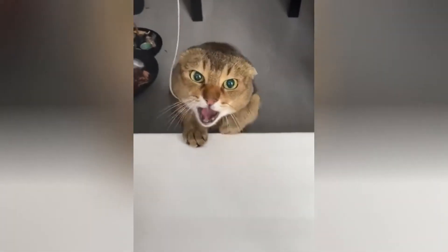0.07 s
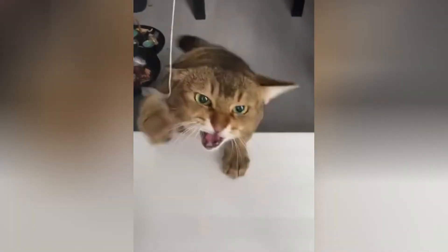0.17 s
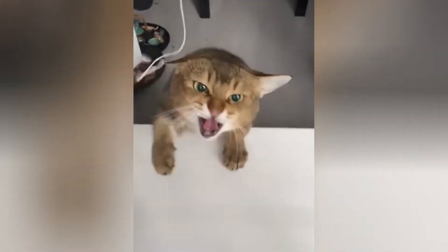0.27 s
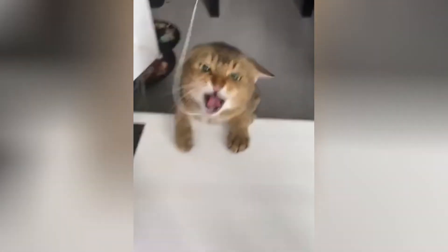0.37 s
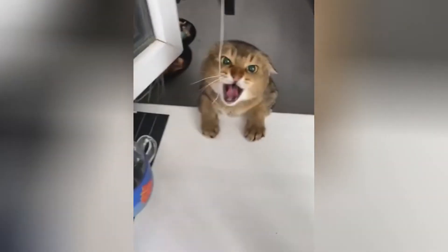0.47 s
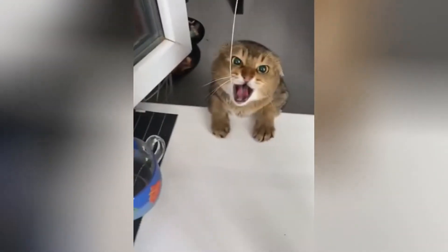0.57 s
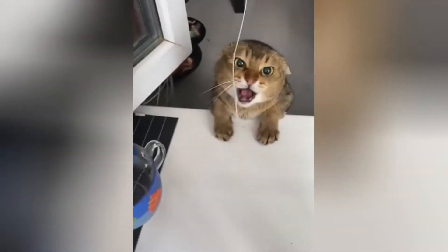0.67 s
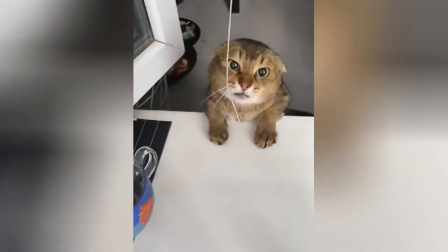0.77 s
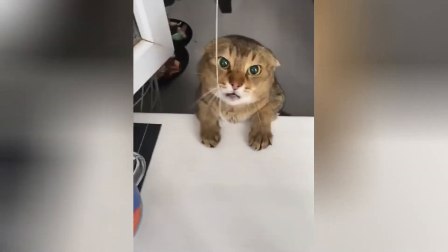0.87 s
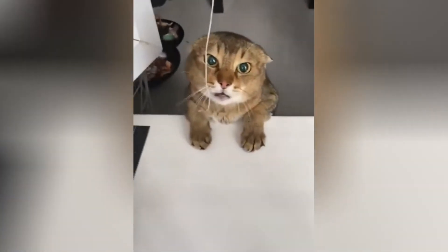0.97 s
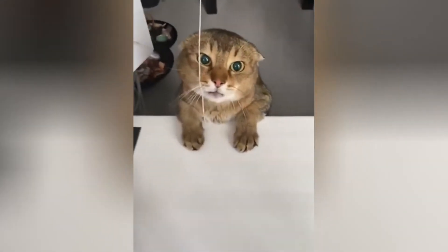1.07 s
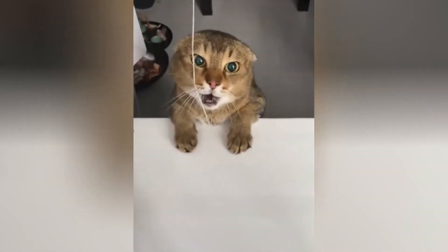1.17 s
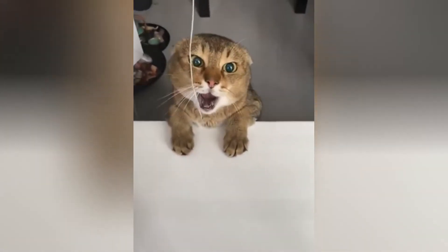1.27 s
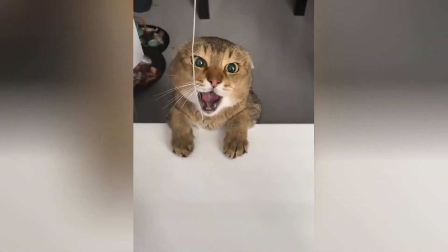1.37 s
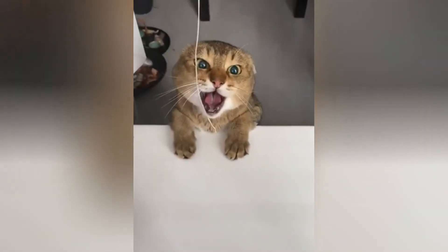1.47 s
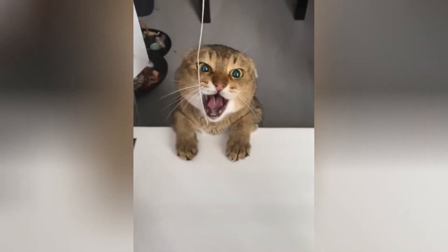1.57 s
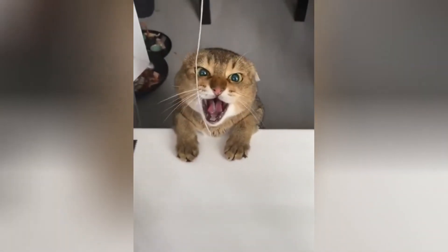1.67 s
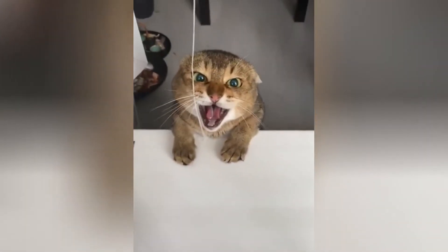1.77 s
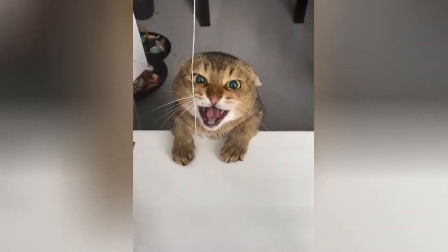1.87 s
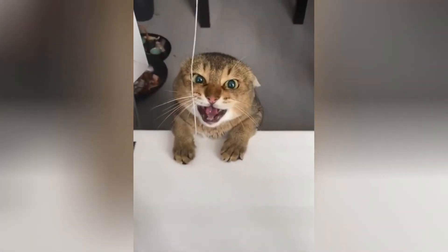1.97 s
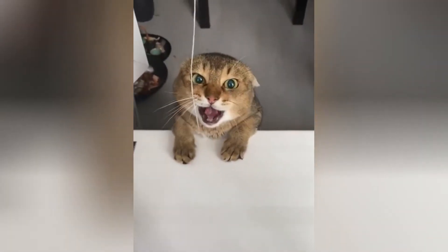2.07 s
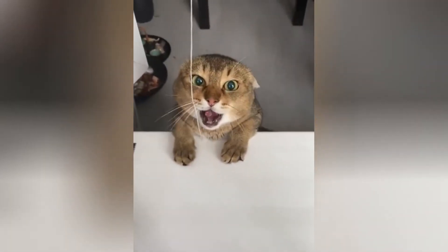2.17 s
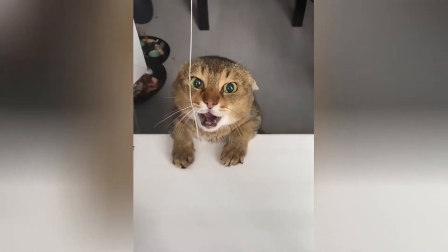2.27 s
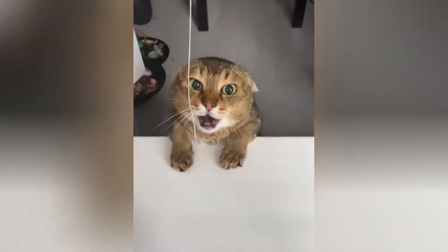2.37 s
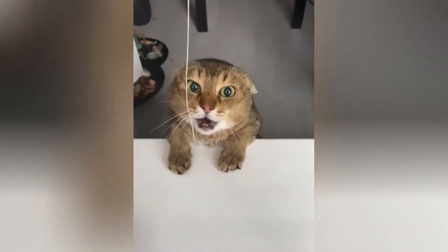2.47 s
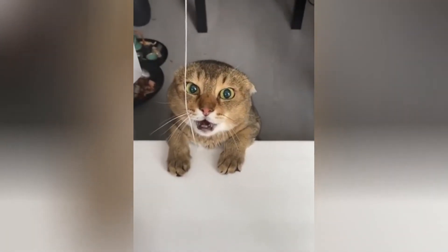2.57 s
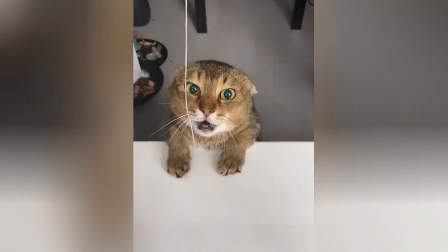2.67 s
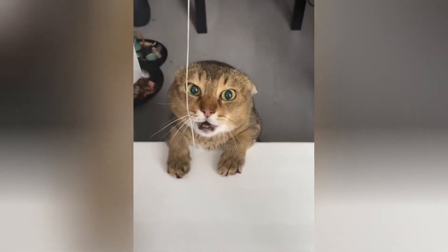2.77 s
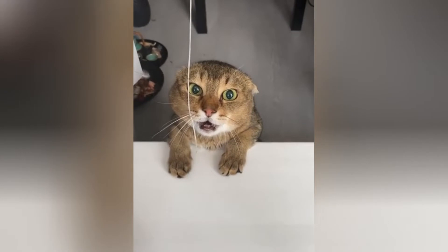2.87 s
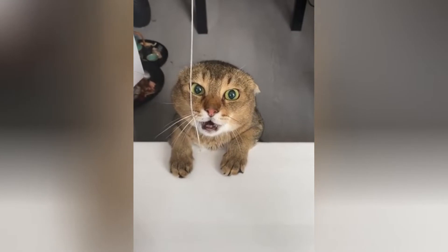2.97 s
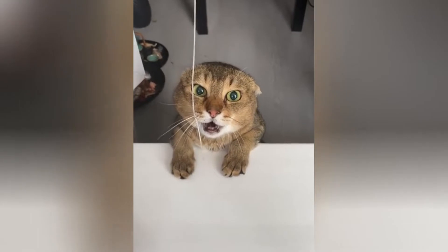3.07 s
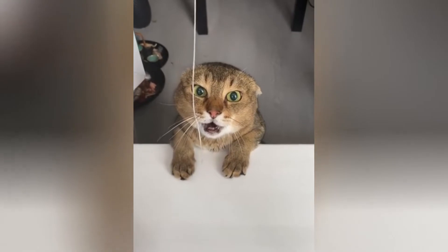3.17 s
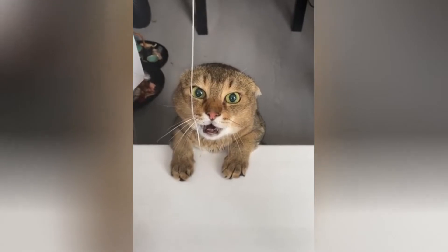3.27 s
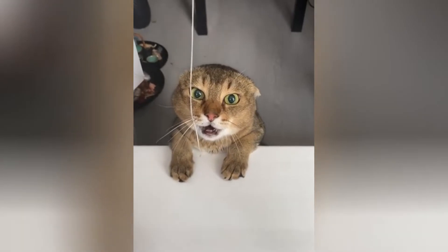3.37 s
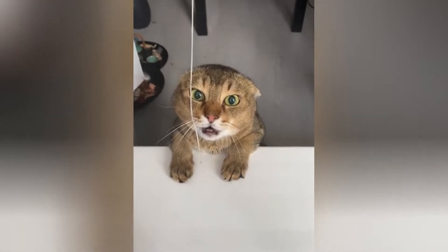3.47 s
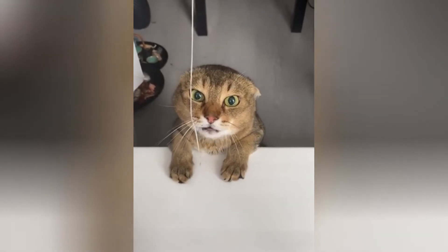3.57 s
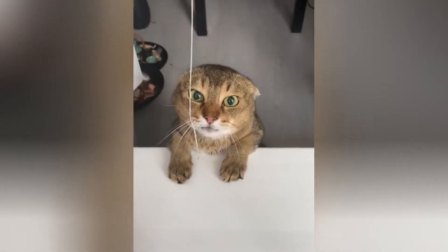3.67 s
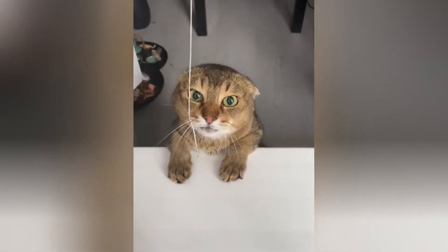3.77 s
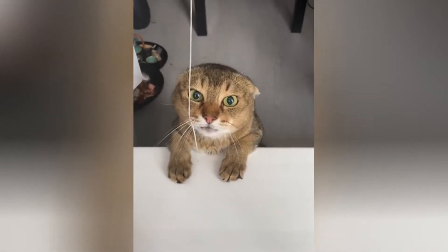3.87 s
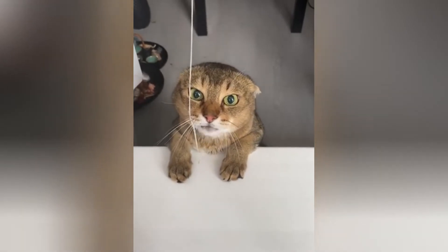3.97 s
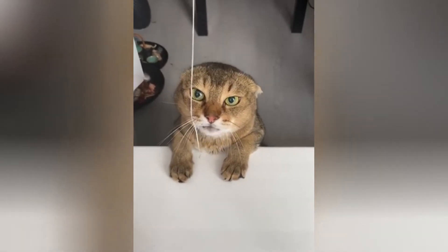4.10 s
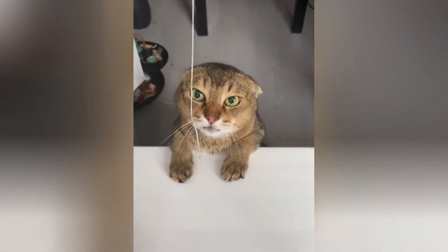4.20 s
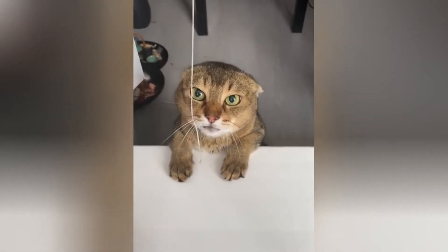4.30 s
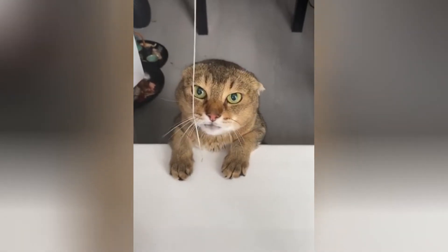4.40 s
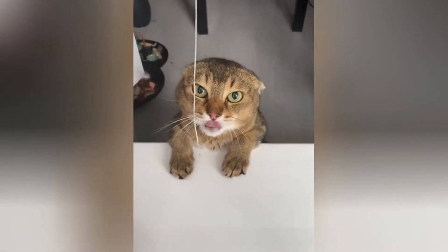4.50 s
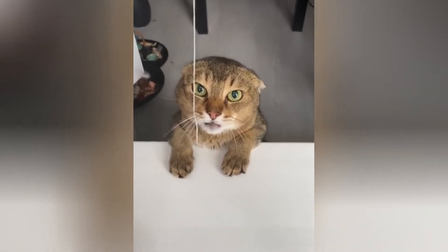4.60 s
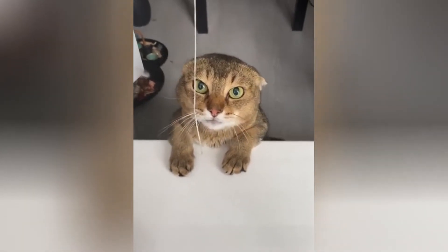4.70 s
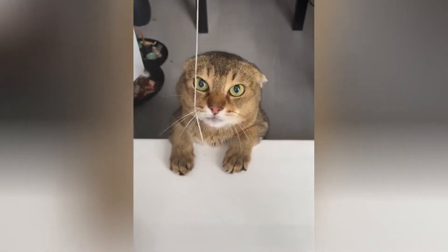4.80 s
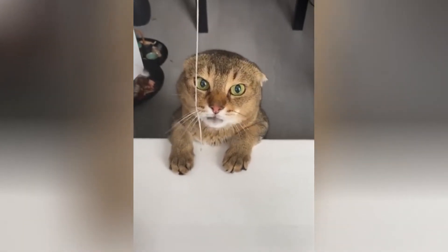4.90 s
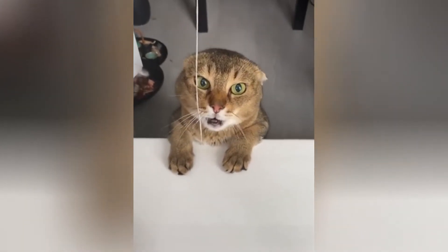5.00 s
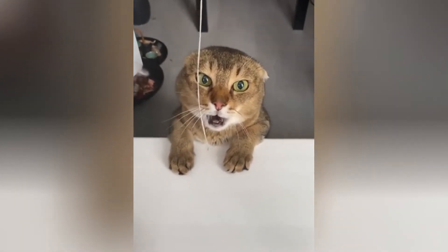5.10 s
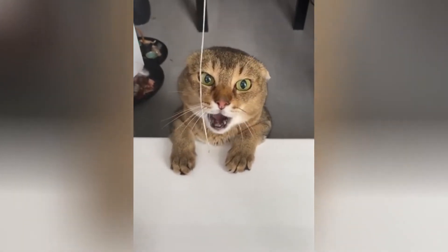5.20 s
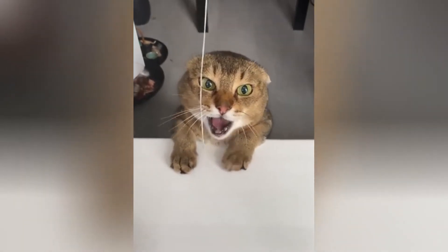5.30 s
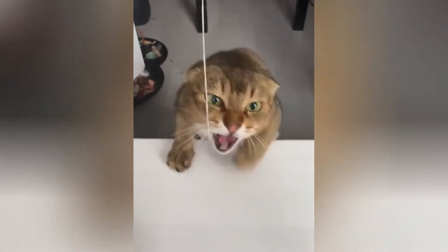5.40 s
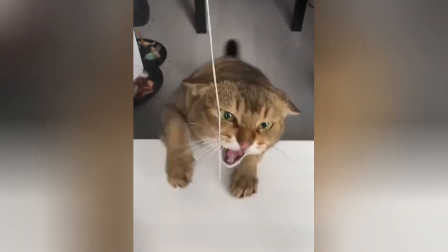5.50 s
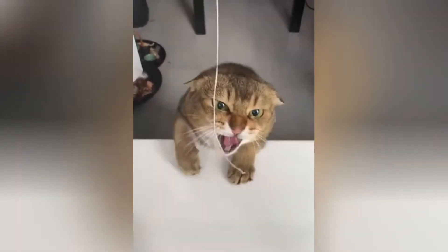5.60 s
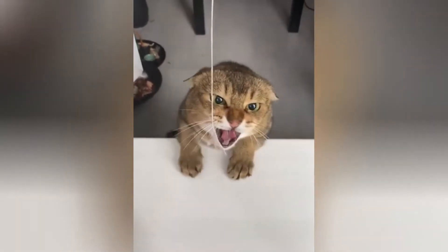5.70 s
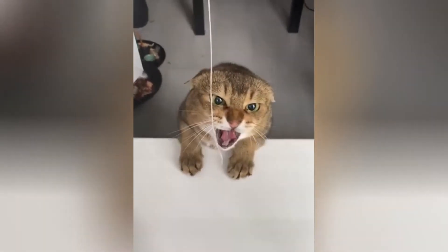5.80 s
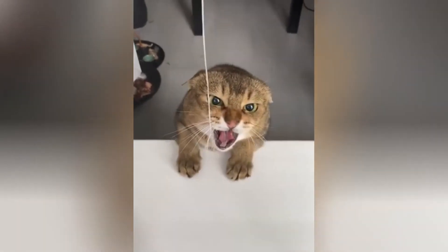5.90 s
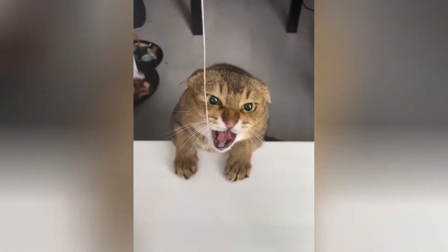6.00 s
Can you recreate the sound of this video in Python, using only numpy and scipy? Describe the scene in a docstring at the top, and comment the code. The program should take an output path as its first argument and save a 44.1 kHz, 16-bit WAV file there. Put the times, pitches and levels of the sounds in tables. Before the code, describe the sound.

A cat yowls close to the microphone in a quiet room with a slight echo. The first call starts at once, rising to a loud, high, raspy cry and dropping away at 0.8 seconds. A paw thumps softly on a table at about 0.2 seconds. Around 1 second the cat takes a faint, fluttering, snore-like breath. From 1.2 seconds comes a long, clearer yowl that peaks in pitch near 1.8 seconds, then slides steadily down and fades, becoming a very quiet closed-mouth hum from about 3.6 to 4.3 seconds. Tiny lip and claw ticks fall between 4.5 and 5.1 seconds. The third call begins low and hoarse at 5 seconds and climbs to a loud, high cry by 5.5 seconds, where a lighter paw thump lands. It holds that pitch, repeatedly breaking into a rasp, until the end at about 6 seconds.

```python
"""Three yowls from a cat leaning on a table edge indoors, close to a hand-held stereo microphone.
Its vocal folds ring mouth, throat and nose, and at full effort break into a rasp; the long middle
call sinks to a closed-mouth hum. Slack tissue flaps in a snoring breath after the first call.
A paw thumps the table twice, and lips and claws tick faintly, over the hush of a quiet room."""
import sys
import numpy as np
from scipy import signal
from scipy.fft import rfft, irfft, next_fast_len
from scipy.io import wavfile
from scipy.ndimage import uniform_filter1d

SR = 44100
rng = np.random.default_rng(int(sys.argv[2]) if len(sys.argv) > 2 else 0)


def dump(signal):
    """Clip the signal to [-1, 1] and save it as 16-bit WAV at the path in sys.argv[1]."""
    limited = np.clip(np.atleast_2d(signal).T, -1, 1)
    pcm = np.round(limited * 32767).astype(np.int16)
    wavfile.write(sys.argv[1], SR, pcm)


N = 266805
BAND_LIMIT_HZ = 15750

# Vocal tract per call: (time [s], mouth resonance [Hz], mouth [dB], throat [dB], sizzle [dB])
TRACT_A = [(0.0, 1550, -42.5, -42, -67.5), (0.061, 2044, -27.5, -44, -58), (0.106, 2300, -17, -35.5, -56),
           (0.168, 2240, -11.5, -37.5, -47), (0.27, 2120, -14.5, -42, -50),
           (0.362, 2185, -16.5, -37.5, -50), (0.42, 2050, -21.5, -33.5, -47.5),
           (0.52, 2050, -19, -36.5, -47.5), (0.626, 2120, -12.5, -39, -48), (0.648, 2060, -18, -38, -48.5),
           (0.681, 1938, -17.5, -36.5, -47.5), (0.718, 1785, -18, -32, -50.5),
           (0.755, 1580, -30, -56.5, -59.5), (0.79, 1494, -59, -62, -68)]
TRACT_B = [(1.17, 900, -66.5, -92, -100), (1.23, 1498, -53.5, -63.5, -76),
           (1.33, 1648, -30.5, -35.5, -78.5), (1.46, 1800, -30, -37, -56.5), (1.55, 1800, -27, -32, -52.5),
           (1.62, 1930, -22, -25, -47.5), (1.69, 2140, -21.5, -30.5, -45.5), (1.77, 1920, -24.5, -28, -41),
           (1.85, 1860, -27.5, -29.5, -38.5), (1.96, 1740, -23, -27.5, -45), (2.079, 1650, -17, -29, -50.5),
           (2.149, 1670, -14.5, -54, -54.5), (2.279, 1630, -18, -56, -66), (2.431, 1480, -27.5, -44, -64.5),
           (2.64, 1300, -34.5, -34.5, -64), (2.74, 1295, -38, -40, -71), (2.86, 1200, -39, -43, -69.5),
           (2.96, 1198, -37, -48.5, -68), (3.091, 1130, -33, -32.5, -67.5), (3.126, 1083, -39, -34.5, -70),
           (3.28, 1090, -33, -41, -73), (3.459, 1122, -45, -63.5, -76), (3.558, 1140, -57.5, -48, -76),
           (3.66, 545, -55.5, -63, -91), (3.79, 467, -61.5, -105, -106), (4.2, 433.5, -63, -94, -111),
           (4.27, 474, -77, -94.5, -110)]
TRACT_C = [(4.961, 1524, -72.5, -85, -99), (5.04, 1340, -70, -74.5, -83), (5.166, 1413, -38, -44, -71.5),
           (5.22, 1793, -32.5, -48, -71), (5.326, 1786, -28, -44, -66), (5.378, 2120, -22, -26.5, -52.5),
           (5.438, 2250, -16.5, -28, -51.5), (5.474, 2350, -10, -36, -48.5), (5.508, 2200, -15, -43, -51),
           (5.61, 2223, -13.5, -37, -45), (5.68, 2300, -17, -51, -63), (5.72, 2178, -14, -35.5, -54),
           (5.78, 2343, -19, -34.5, -50), (5.83, 2194, -13.5, -36.5, -48.5), (5.98, 2250, -15, -49, -56),
           (6.05, 2132, -13, -35, -58)]
# Fold pitch before strain: (time [s], pitch [Hz])
PITCH_A = [(0.0, 338.5), (0.04, 421), (0.072, 486.6), (0.11, 546.4), (0.15, 678.5), (0.22, 700),
           (0.27, 746.2), (0.43, 747), (0.47, 708.3), (0.52, 722), (0.63, 716.5), (0.692, 641.6),
           (0.756, 495), (0.79, 435.4)]
PITCH_B = [(1.17, 191), (1.214, 295.2), (1.272, 407.4), (1.3, 450.1), (1.398, 486.5), (1.54, 531.2),
           (1.6, 571.3), (1.68, 632), (1.75, 663), (1.81, 676.4), (1.88, 659.7), (1.982, 613.4),
           (2.088, 565.3), (2.134, 556.3), (2.298, 540.5), (2.396, 512.4), (2.63, 450), (2.806, 408.7),
           (2.896, 397.5), (3.091, 388.9), (3.122, 374.7), (3.179, 369.7), (3.27, 363.8), (3.442, 348.6),
           (3.598, 310.6), (3.678, 285), (3.734, 256), (3.822, 258.3), (4.05, 256), (4.186, 238.5),
           (4.22, 227), (4.27, 232)]
PITCH_C = [(4.96, 199.6), (5.02, 131), (5.09, 191.3), (5.152, 322.8), (5.202, 416.4), (5.316, 491.9),
           (5.424, 669.5), (5.455, 699.7), (5.5, 738.8), (5.574, 741.5), (5.6, 700), (5.659, 742),
           (5.7, 733), (5.78, 717.4), (5.9, 744), (6.05, 717.5)]
# Nasal ring, one list per call: (time [s], level [dB])
NASAL_LEVELS = [
    [(0.0, -54.5), (0.062, -44.5), (0.076, -43.5), (0.148, -29), (0.374, -41), (0.4, -37.5), (0.5, -34.5),
     (0.532, -29.5), (0.66, -34), (0.72, -48), (0.756, -44), (0.79, -71)],
    [(1.17, -99), (1.23, -75), (1.41, -47.5), (1.83, -35.5), (2.12, -49.5), (2.26, -47.5), (2.46, -60),
     (2.86, -65.5), (3.07, -59.5), (3.53, -64.5), (3.65, -91), (4.27, -101)],
    [(4.96, -99), (4.98, -82), (5.032, -90), (5.096, -73), (5.324, -52.5), (5.384, -34), (5.614, -33),
     (5.658, -38), (5.736, -33.5), (5.98, -37), (6.018, -31), (6.05, -31.5)],
]
# Hoarse onset per call: (initial rasp [0-1], decay [s], rasp until full voice [0-1], full voice at [s])
HOARSE_ONSETS = [(.1, .05, .2, .14), (.4, .05, .006, 1.64), (.4, .1, .19, 5.42)]
# Slack throat per call: (resonance [Hz])
THROAT_SLACK_HZ = [3200, 2462, 2730]
# Hum on clear, tense notes, per call: (level change [dB])
HUM_TENSE_DB = [-17.5, -11.5, 2.5]


def yowls():
    """Three voiced calls, each as (start time, sound)."""
    calls = zip((TRACT_A, TRACT_B, TRACT_C), (PITCH_A, PITCH_B, PITCH_C),
                NASAL_LEVELS, HOARSE_ONSETS, THROAT_SLACK_HZ, HUM_TENSE_DB)
    return [yowl(*call) for call in calls]


# Nasal and top-treble resonances: (centre [Hz], width [Hz], level added as the jaw opens [dB],
# base level [dB], counted 1.5 times open and 2.5 times shut)
NASAL_MODES = [(3453, 160, -35, -1.5), (4875, 170, -14, 0.5), (5300, 720, -5, -5), (5780, 570, -4.5, -21.5),
               (6820, 500, -16, 1)]
SIZZLE_MODES = [(8683, 2800, 0.5, 1), (9910, 580, -15, -32.5), (12350, 540, -16.5, 8),
                (15370, 480, -15.5, -34)]
# Chest hum: (pitch [Hz], level [dB])
CHEST_HUM = [(150, -59.5), (300, -58), (460, -65), (560, -61), (680, -53.5), (740, -59)]
HUM_RASP_DB, RATTLE_OVER_HUM_DB, STRAIN_RISE = 6.5, 6.5, 0.065


def yowl(tract, pitch, nasal, onset, slack_hz, hum_tense_db):
    """Fold pulses ring mouth, throat and nose over a chest hum; a low rattle joins the hard rasps."""
    t, (mouth_hz, mouth_db, throat_db, sizzle_db) = curves(tract)
    nasal_db = np.interp(t, *np.transpose(nasal))
    pitch_hz = uniform_filter1d(np.interp(t, *np.transpose(pitch)), size=800, mode="nearest")
    jaw = np.clip((mouth_hz - 1250) / 600, 0, 1)  # the mouth resonance rises as the jaw opens
    tension = np.interp(pitch_hz, (616, 667), (0, 1))
    rasp, tripling = voice_breaks(t, pitch_hz, onset)
    strain = uniform_filter1d(rasp * (tripling > 0), size=800)
    folds, cycles = vocal_folds(t, pitch_hz * (1 + STRAIN_RISE * strain), rasp, tripling, jaw)

    voice = gain_of(mouth_db) * mouth(folds, mouth_hz)
    voice -= gain_of(throat_db) * throat(folds, pitch_hz, slack_hz, tension, jaw)
    for level_db, modes in ((nasal_db, NASAL_MODES), (sizzle_db, SIZZLE_MODES)):
        ringing = sum(gain_of(jaw * added_db + (2.5 - jaw) * base_db) * ring(folds, hz, width_hz)
                      for hz, width_hz, added_db, base_db in modes)
        voice += gain_of(level_db) * steady(ringing)

    hum_db = log_lookup(CHEST_HUM, pitch_hz) + HUM_RASP_DB * rasp + hum_tense_db * tension * (1 - rasp)
    hum_cycles = cycles + .15 * rasp * wander(len(t), 120)
    voice += gain_of(hum_db) * np.sqrt(2) * np.cos(2 * np.pi * hum_cycles)
    rattle = steady(ring(folds, hz=980, width_hz=130))
    voice += gain_of(hum_db + RATTLE_OVER_HUM_DB) * tripling * rattle
    edge_s = np.minimum(t - t[0], t[-1] - t)
    return t[0], voice * np.minimum(1, edge_s / .006)


# Voice breaks: (start [s], end [s], rasp [0-1], three-cycle pattern depth [0-1])
BREAKS = [(.14, .512, .85, .6), (1.52, 1.65, .04, 0), (1.9, 2.03, .012, 0), (3.42, 3.64, .03, 0),
          (5.08, 5.14, .8, .3), (5.45, 5.6, .9, .45), (5.612, 5.695, .8, .55), (5.903, 5.945, .75, .55),
          (5.975, 6.0, .75, .4)]
CLEAR_RASP, SLACK_RASP = .004, .12
BREAK_EDGE_S, FRINGE_S, FRINGE_SHARE = .018, .03, .07


def voice_breaks(t, pitch_hz, onset):
    """Rasp and three-cycle depth: the folds start hoarse, go ragged in breaks, loosen in quick falls."""
    initial, decay_s, held, full_voice_s = onset
    rasp = CLEAR_RASP + initial * np.exp(-(t - t[0]) / decay_s)
    rasp += held * np.clip((full_voice_s - t) / BREAK_EDGE_S, 0, 1)
    fall_per_s = -np.gradient(np.log(pitch_hz)) * SR
    rasp += np.interp(fall_per_s, (1.1, 4.5), (0, SLACK_RASP))
    tripling = np.zeros(len(t))
    for start_s, end_s, break_rasp, depth in BREAKS:
        inside_s = np.minimum(t - start_s, end_s - t)
        gate = np.clip(.5 + inside_s / BREAK_EDGE_S, 0, 1)
        fringe = FRINGE_SHARE * np.exp(np.minimum(inside_s, 0) / FRINGE_S)
        rasp = np.maximum(rasp, break_rasp * np.maximum(gate, fringe))
        tripling += depth * gate
    return rasp, tripling


def vocal_folds(t, pitch_hz, rasp, tripling, jaw):
    """Overtones and cycle count of the folds; rasp makes pulses uneven in time and strength, and noisy."""
    waver = .001 + .0065 * (pitch_hz / 750) ** 12  # strain wavers high notes
    cycles = np.cumsum(pitch_hz * (1 + waver * wander(len(t), 40))) / SR
    pattern = tripling * np.sin(2 * np.pi * (cycles / 3 + .15 * wander(len(t), 40)))
    cycles = cycles + .046 * rasp * wander(len(t), 160) + .08 * pattern
    overtones = np.zeros(len(t))
    for k in range(2, 45):
        swell_hz = rng.uniform(2.136, 9)
        swell_db = (4.2 + 1.2 * jaw) * np.sin(2 * np.pi * (swell_hz * t + rng.random())) * (k > 3)
        overtone = np.cos(2 * np.pi * (k * cycles + rng.random()))
        overtones += gain_of(swell_db) * overtone * (k * pitch_hz < BAND_LIMIT_HZ)
    shimmer = 1 + .36 * rasp * wander(len(t), 90) + .35 * pattern
    noise = .14 * rasp * rng.standard_normal(len(t))
    return steady(overtones) * shimmer + noise, cycles


def mouth(folds, mouth_hz):
    """The mouth cavity: a sharp moving peak on a broad skirt."""
    peak = resonate(folds, mouth_hz, width_hz=231.5)
    skirt = gain_of(db=5) * ring(peak, mouth_hz, width_hz=1800)
    return steady(resonate(peak, mouth_hz, width_hz=231.5) + skirt)


def throat(folds, pitch_hz, slack_hz, tension, jaw):
    """The throat resonance rises with tension, sinks on low notes and narrows as the jaw shuts."""
    sink_hz = np.interp(pitch_hz, (310, 345), (279.5, 0))
    throat_hz = slack_hz + tension * (3709 - slack_hz) - sink_hz
    broad = steady(ring(folds, throat_hz, width_hz=1200))
    narrow = unit_rms(ring(folds, throat_hz, width_hz=190))
    return jaw * broad + (1 - jaw) * narrow


# Snoring breath: (time [s], level [dB], flap rate [Hz])
SNORE = [(0.85, -63.5, 95), (0.96, -51, 90.5), (1.086, -56.5, 90), (1.12, -85, 110)]
# Airway resonances: (centre [Hz], width [Hz], level [dB])
AIRWAY_MODES = [(89.7, 98, 3.5), (357, 920, -3.5), (937.4, 120, -10.5), (1127, 290, -10), (3496, 400, -15),
                (4630, 540, -16)]


def snore():
    """Slack tissue flaps in the in-breath, strong and weak in turn, each flap with a puff of air."""
    t, (level_db, flap_hz) = curves(SNORE)
    cycles = np.cumsum(flap_hz * (1 + .07 * wander(len(t), 30))) / SR
    count = np.floor(cycles)
    flaps = np.diff(count, prepend=0) * (1 + 0.46 * np.cos(np.pi * count))
    puffs = 1.3 * (.4 + np.exp(-(cycles % 1) / .3)) * rng.standard_normal(len(t))
    drive = unit_rms(flaps) + puffs
    airway = sum(gain_of(db) * unit_rms(resonate(resonate(drive, hz, width_hz), hz, 2 * width_hz))
                 for hz, width_hz, db in AIRWAY_MODES)
    return t[0], gain_of(level_db) * unit_rms(airway) * signal.windows.tukey(len(t), .1)


# Paw strikes: (time [s], peak [dB], boost of modes above 200 Hz [dB])
PAW_STRIKES = [(0.156, -26, 1), (5.474, -40, 4.5)]
# Table-top modes: (frequency [Hz], level [dB], t60 [s])
TABLE_MODES = [(98.8, 0.5, 0.13), (118.2, -11.5, 0.25), (183, -7, 0.089), (280, -7, 0.055),
               (470, -3.5, 0.016), (833, -17, 0.075)]


def paw_thumps():
    """A soft paw rings the table top; its lowest modes swell a moment later."""
    out, t = np.zeros(N), np.arange(SR // 3) / SR
    for start_s, peak_db, boost_db in PAW_STRIKES:
        thump = np.zeros(len(t))
        for hz, db, t60_s in TABLE_MODES:
            attack = 1 - np.exp(-t * hz / 1.5)
            decay = gain_of(db + boost_db * (hz > 200) - 60 * t / t60_s)
            thump += attack * decay * np.sin(2 * np.pi * hz * t)
        add(out, start_s, gain_of(peak_db) * thump / abs(thump).max())
    return out


# Lip and claw ticks: (time [s], initial level [dB], centre [Hz], t60 [s])
TICKS = [(4.53, -64, 320, .05), (4.67, -66, 248, 0.051), (4.937, -64.5, 3040, .015),
         (4.952, -56, 2350, 0.027), (4.984, -58.5, 1490, 0.071), (5.073, -54, 1830, 0.069)]


def lips_and_claws():
    """Lips and claws make tiny damped ticks of narrow-band noise."""
    out, t = np.zeros(N), np.arange(3000) / SR
    for start_s, db, hz, t60_s in TICKS:
        noise = unit_rms(resonate(rng.standard_normal(len(t)), hz, width_hz=0.073 * hz))
        add(out, start_s, gain_of(db - 60 * t / t60_s) * noise)
    return out


# Room reverberation: (frequency [Hz], t60 [s], level [dB])
REVERB = [(250, 0.38, -37.5), (590, 0.73, -2), (1500, 0.21, -7), (3898, 0.24, -3.5), (9570, 0.033, -9)]


def room_echoes(source):
    """Reflections from ahead and from the sides: sparse taps, each band dying at its own rate."""
    taps = np.zeros((2, SR // 2))
    delays = np.arange(100, SR // 2 - 20, 20) + rng.integers(0, 20, (2, (SR // 2 - 101) // 20))
    np.put_along_axis(taps, delays, rng.choice([-1., 1.], delays.shape), 1)
    hz, t, bands = signal.stft(taps, SR, nperseg=256)
    bands *= gain_of(-60 * t / log_lookup(REVERB, hz)[:, None])
    bands *= np.sqrt(len(hz) / np.sum(abs(bands) ** 2, axis=(0, 2)))[:, None]  # equal energy per band
    norm = np.linalg.norm(signal.istft(bands, SR, nperseg=256)[1][0])
    bands *= gain_of(log_lookup(REVERB, hz, column=2))[:, None]
    tails = signal.istft(bands, SR, nperseg=256)[1] / norm
    return signal.fftconvolve(source[None], tails, axes=1)[:, :N]


# Microphone ports: (frequency [Hz], left minus right [dB], left lead [half turns])
PORTS = [(200, 0, 0), (350, 4, 0), (480, 6, 0), (560, 4, 0), (660, 2, 1), (830, 7, 2), (950, 11, 2.9),
         (1090, 2, 3.2), (1170, 6, 4), (1450, -2, 4), (1650, 2, 4), (1900, 0, 4), (2200, 4, 4),
         (2600, -3, 4), (3300, 0, 4), (4300, -6, 4), (6300, 0, 4)]
# Overall tone colour, with a sharp treble drop above 6.4 kHz: (frequency [Hz], gain [dB])
TONE_COLOUR = [(200, -1), (480, 8.5), (660, -5.5), (900, 7.5), (1090, -4), (1300, 1), (2200, -5.5),
               (2780, -2.5), (2970, -7.5), (3150, -0.5), (4150, 5), (4550, -5), (4800, 0), (5200, 0),
               (6350, 5.5), (6650, -24.5), (8000, -2)]


def microphone(near, echoes):
    """Two ports hear a near source with balance and lead set by frequency; a tone curve shapes the mix."""
    size = next_fast_len(N + SR)
    hz = np.fft.rfftfreq(size, 1 / SR)
    lead_rad = np.pi * log_lookup(PORTS, hz, column=2)
    left = gain_of(log_lookup(PORTS, hz) / 2) * np.exp(1j * lead_rad / 2)
    direct = rfft(near, size) * np.array([left, 1 / left])
    ahead, side = rfft(echoes, size)
    stereo = direct + ahead / 2 + np.array([side, -side])  # side echoes arrive in opposite phase
    return irfft(stereo * gain_of(log_lookup(TONE_COLOUR, hz)), size)[:, :N]


# Room hush spectrum: (frequency [Hz], relative density [dB])
HUSH_SPECTRUM = [(15, -39), (25, -11), (54, -4), (86, -2), (118, -11), (257, -10.5), (318, -8),
                 (438, -20.5), (729, -14.5), (879, -20), (3010, -23), (6200, -38.5), (15000, -51.5)]
# Hush between channels: (frequency [Hz], coherence [0-1])
HUSH_COHERENCE = [(60, 0.84), (240, 0.87), (950, 0.11), (3770, 0.21), (15000, 0.23)]
HUSH_RMS_DB, PATCH_DB = -70, 1.8


def room_hush():
    """The room's low hush: noise in drifting patches, much alike on both sides in the bass."""
    frames, hz = N // 256 + 5, np.fft.rfftfreq(1024, 1 / SR)
    left_re, left_im, apart_re, apart_im, patches = rng.standard_normal((frames, 513, 5)).T
    patches = unit_rms(uniform_filter1d(uniform_filter1d(patches, 8, axis=0), 10, axis=1))
    coherence = log_lookup(HUSH_COHERENCE, hz)[:, None]
    left = left_re + 1j * left_im
    right = coherence * left + np.sqrt(1 - coherence ** 2) * (apart_re + 1j * apart_im)
    spectra = np.array([left, right]) * gain_of(log_lookup(HUSH_SPECTRUM, hz)[:, None] + PATCH_DB * patches)
    noise = signal.istft(spectra, nperseg=1024, noverlap=768)[1][:, :N]
    return gain_of(HUSH_RMS_DB) * unit_rms(noise)


def gain_of(db):
    """Decibels to amplitude."""
    return 10 ** (np.asarray(db) / 20)


def unit_rms(x):
    """Scales to rms 1."""
    return x / np.sqrt(np.mean(x ** 2) + 1e-20)


def steady(x):
    """Holds rms near 1 over about 40 ms."""
    power = uniform_filter1d(uniform_filter1d(x ** 2, size=1200), size=1200)
    return x / np.sqrt(abs(power) + 1e-12)


def log_lookup(table, hz, column=1):
    """Interpolates a column on a log-frequency axis."""
    columns = np.transpose(table)
    return np.interp(np.log(hz + 1), np.log(columns[0] + 1), columns[column])


def curves(table):
    """Sample times and a table's columns along them."""
    times_s, *columns = np.transpose(table)
    t = np.arange(times_s[0], times_s[-1], 1 / SR)
    return t, [np.interp(t, times_s, column) for column in columns]


def add(mix, start_s, sound):
    """Mixes a sound in at start_s."""
    part = mix[round(start_s * SR):][:len(sound)]
    part += sound[:len(part)]


def resonate(x, hz, width_hz):
    """Unity-gain moving resonance: shift hz to zero, smooth, shift back."""
    carrier = np.exp(2j * np.pi * np.cumsum(hz * np.ones(len(x))) / SR)
    pole = np.exp(-np.pi * width_hz / SR)
    return 2 * (carrier * signal.lfilter([1 - pole], [1, -pole], x / carrier + 1e-18)).real


def ring(x, hz, width_hz):
    """A resonance applied twice, for steep skirts."""
    return resonate(resonate(x, hz, width_hz), hz, width_hz)


def wander(count, hz):
    """Noise of rms 1, low-passed at hz."""
    return unit_rms(signal.lfilter(*signal.butter(2, hz, fs=SR), rng.standard_normal(count)))


def scene():
    """The cat close by, its echoes, and the room's hush."""
    cat = paw_thumps() + lips_and_claws()
    for start_s, sound in yowls() + [snore()]:
        add(cat, start_s, sound)
    return microphone(cat, room_echoes(cat)) + room_hush()


def record(dry):
    """A steep low-pass at the band limit."""
    lowpass = signal.firwin(1023, BAND_LIMIT_HZ, window=("kaiser", 10), fs=SR)
    return signal.oaconvolve(dry, lowpass[None], "same")


dry = scene()
out = record(dry)
dump(out)
```